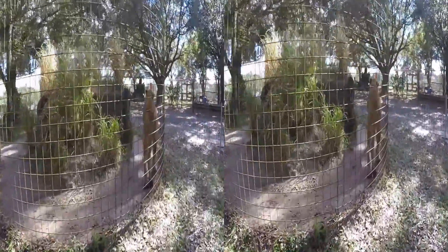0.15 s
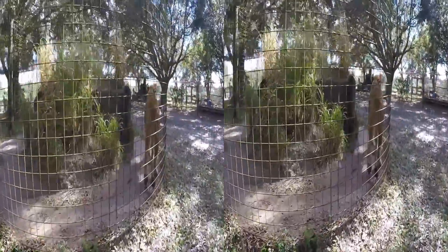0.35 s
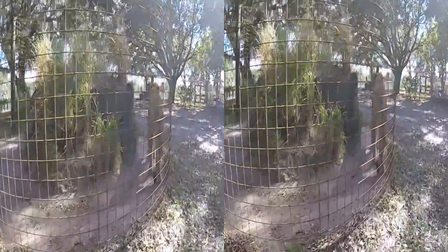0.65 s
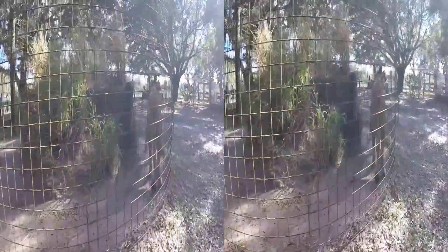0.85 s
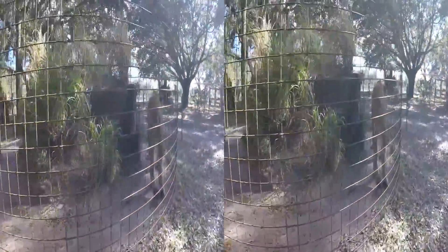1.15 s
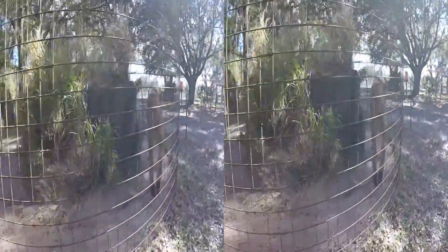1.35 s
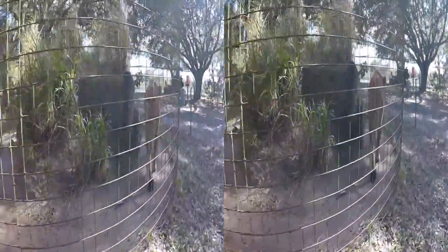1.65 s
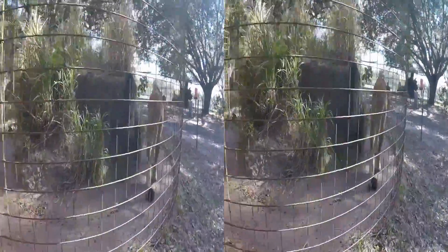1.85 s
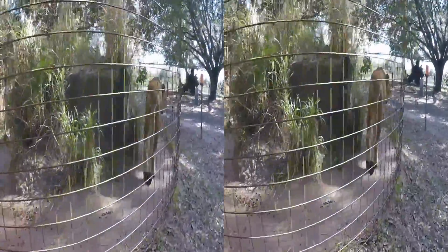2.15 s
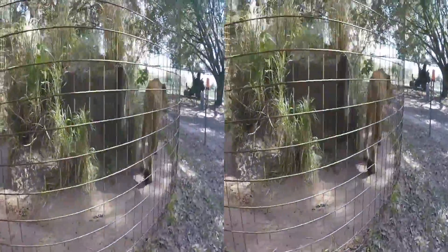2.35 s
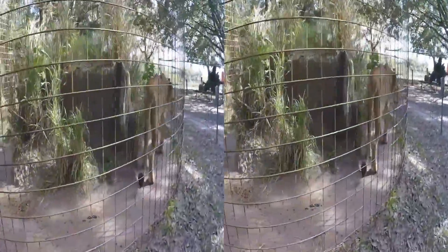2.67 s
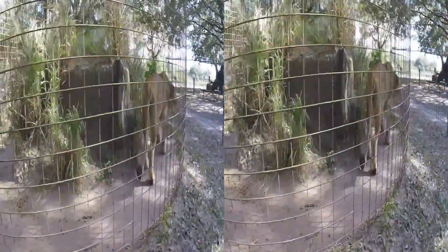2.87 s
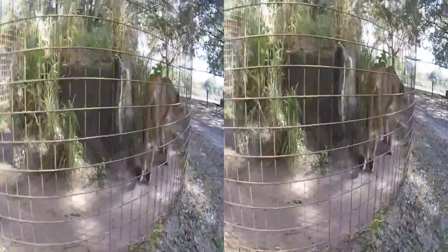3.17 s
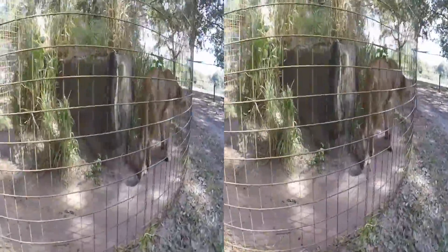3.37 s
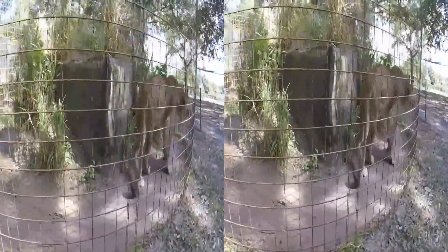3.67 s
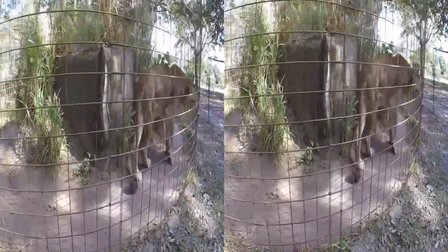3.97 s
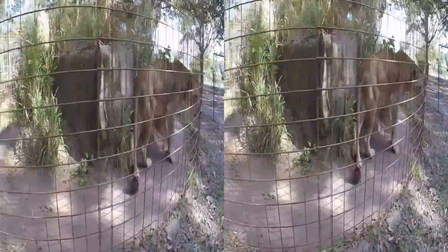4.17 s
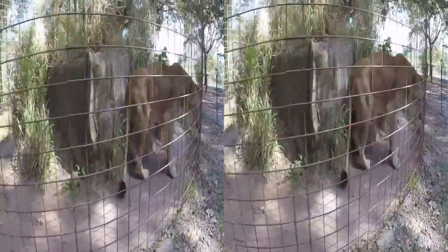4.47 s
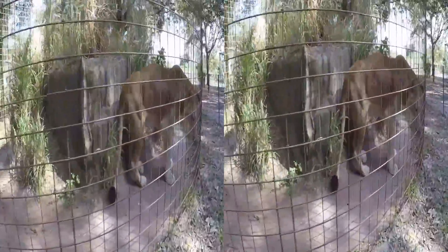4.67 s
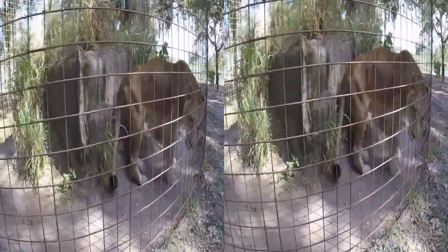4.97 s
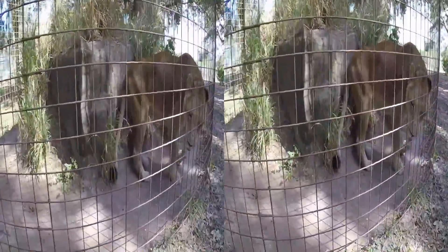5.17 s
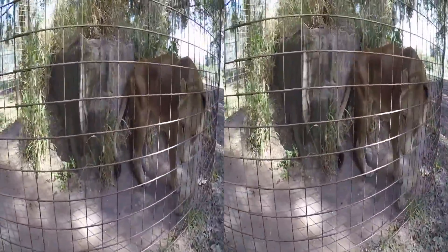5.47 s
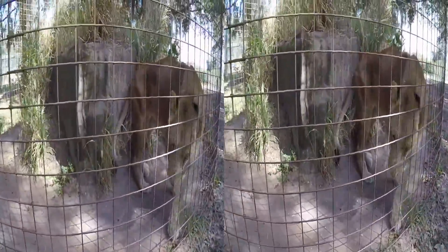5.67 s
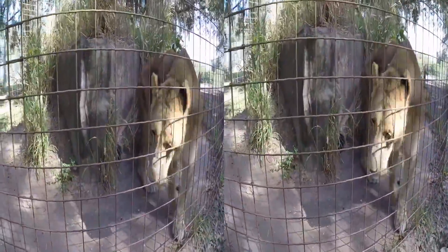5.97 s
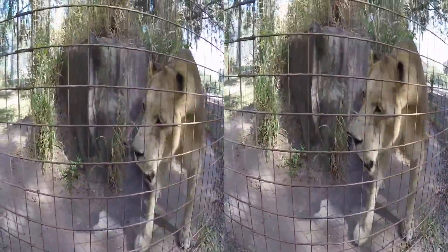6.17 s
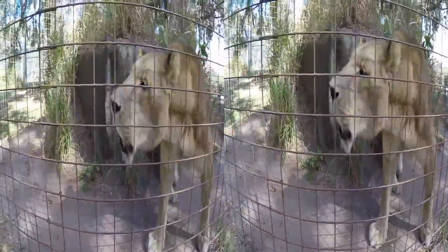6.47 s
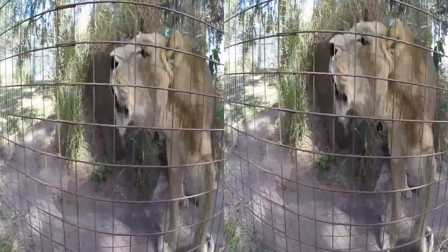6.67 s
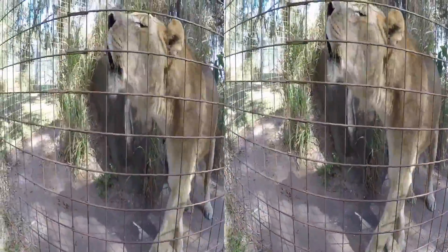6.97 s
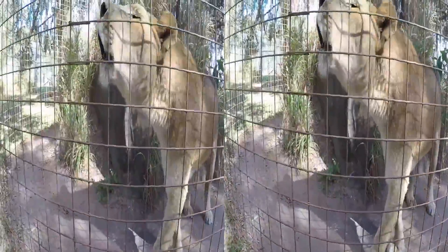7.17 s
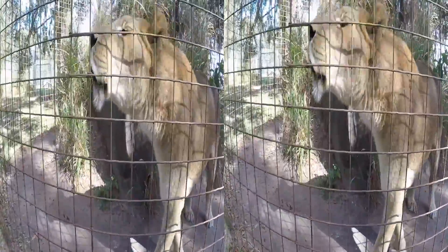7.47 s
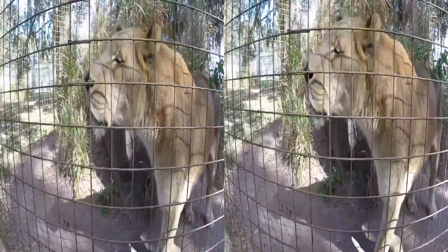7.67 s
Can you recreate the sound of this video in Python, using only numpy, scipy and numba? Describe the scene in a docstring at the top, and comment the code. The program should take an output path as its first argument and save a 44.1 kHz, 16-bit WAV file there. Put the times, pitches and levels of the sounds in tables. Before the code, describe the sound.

A lioness gives a short, low groan that ends in a rattle. Wind buffets the microphone in puffs while dry leaves rustle and twigs snap under her paws. She roars twice more as she approaches, each call moving from a moan through a thin whistle into a rough growl and rattle. The last is the loudest and closest. A bird chips faintly over distant air and traffic in a wooded outdoor place.

```python
"""A lioness groans while wind buffets the microphone. She roars three times as she walks closer among trees.
Her vocal folds beat through throat, palate, mouth and teeth over a pure chest tone; the later roars pass
from a moan through a thin whistle to a growl that skips every other beat, and each roar ends in a rattle.
Dry leaves rustle and twigs snap underfoot, and a far bird chips over a wash of distant air and traffic."""
import sys
import numpy as np
from scipy import signal
from scipy.fft import rfft, irfft, next_fast_len
from scipy.io import wavfile
from scipy.ndimage import uniform_filter1d, map_coordinates
from numba import njit

SR = 44100
rng = np.random.default_rng(int(sys.argv[2]) if len(sys.argv) > 2 else 0)


def wav_out(sig):
    """Save sig, one row per channel (or a flat mono array), as 16-bit PCM at SR to the path in sys.argv[1]."""
    wavfile.write(sys.argv[1], SR, np.round(np.clip(np.atleast_2d(sig).T, -1, 1) * 32767).astype(np.int16))


N = 345300
T = np.arange(N) / SR


def amp(db):
    return 10 ** (np.asarray(db) / 20)


def steady(x, seconds):
    """x levelled to rms 1 over a running window."""
    return x / np.sqrt(np.abs(uniform_filter1d(x ** 2, int(seconds * SR))) + 1e-12)


def curves(phrases):
    """A smooth automation lane for each column after time, then a gate that shuts between phrases."""
    times, *columns = np.transpose(np.concatenate(phrases))
    gate = sum((T >= rows[0][0]) & (T <= rows[-1][0]) for rows in phrases).clip(0, 1) * 1.0
    lanes = [uniform_filter1d(np.interp(T, times, column), 500) for column in columns]
    return lanes + [uniform_filter1d(gate, 600)]


def wobble(knots_per_s):
    """A smooth random modulator."""
    return map_coordinates(rng.standard_normal(int(N * knots_per_s / SR) + 4), [T * knots_per_s])


def eq(x, points):
    """x through an EQ curve of (freq_hz, gain_db) points on a log axis."""
    size = next_fast_len(N + 8192)
    hz, db = np.transpose(points)
    gain_db = np.interp(np.log(np.fft.rfftfreq(size, 1 / SR) + 1), np.log(hz + 1), db)
    return irfft(rfft(x, size) * amp(gain_db), size)[:N]


@njit
def resonate(x, hz, width_hz):
    """A two-pole resonance whose centre can move."""
    y = np.zeros(len(x))
    r = np.exp(-np.pi * width_hz / SR)
    for i in range(2, len(x)):
        feedback = 2 * r * np.cos(2 * np.pi * hz[i] / SR) * y[i - 1] - r * r * y[i - 2]
        y[i] = (1 - r) * (x[i] - x[i - 2]) + feedback
    return y


# Fold texture per stage: skip_share (weakening of every other beat), roughness_share
FOLD_TEXTURES = {"moan": (0, .04), "break": (.4, .5), "slide": (.7, .27), "growl": (.8, .21),
                 "groan": (.12, .16), "rattle": (.6, .78)}
# Tract colour per stage: formant_sink_share_per_s, low_resonance_db, rasp_over_mouth_db
TRACT_COLOURS = {"moan": (0.33, 0, -14.5), "break": (0.06, -6.5, -10.5), "slide": (0.19, -3.5, -12.5),
                 "growl": (.27, -2, -6), "groan": (0.06, -20.5, -8), "rattle": (0, 2, -3.5)}
# Cue list of the roars (a negative fall rises): start_s, stage, throat_hz, throat_fall_hz_per_s,
# palate_hz, palate_fall_hz_per_s, palate_over_mouth_db, formant_ratio
STAGE_CUES = [(0, "break", 464, -2.5, 758, 150, 8, 0.97), (.22, "groan", 534, 9, 803, 29, 0.5, .94),
              (.52, "rattle", 593, 299.5, 792, 22, 4.5, 1.13),
              (2.8, "moan", 339.3, -500, 628, -100, 9.5, 1.3), (3.04, "break", 476, 1.5, 723, 1, 5, 1.15),
              (3.16, "slide", 527.5, 701, 747, 102, -1.5, 1.175),
              (3.299, "growl", 421, 280, 904, 31, -8, 1.253),
              (3.759, "rattle", 407, -17, 700, 0, -10, 1.034), (5.9, "moan", 422.8, -200, 712, 1, 8, 1.28),
              (6.172, "break", 482, 0.5, 692, 0, 8, 1.16), (6.35, "slide", 488.4, 32, 693, 52, 5.5, 1.2),
              (6.51, "growl", 417.9, 47, 893, 281, -2.5, 1.24),
              (6.83, "growl", 345.3, 78, 756, 0.5, -0.5, 1.04), (7.04, "groan", 406, 97, 781, 0, 0, 1.01),
              (7.15, "rattle", 424, 99.5, 801, 2, -6.5, 0.97)]


def larynx(glide_s=.04, longest_sink_s=.6):
    """Each stage sets folds and tract; the resonances drift as the larynx moves, then glide to the next."""
    starts = np.array([row[0] for row in STAGE_CUES])
    now = np.searchsorted(starts, T, side="right") - 1
    rows = np.array([FOLD_TEXTURES[stage] + tuple(cue) + TRACT_COLOURS[stage]
                     for _, stage, *cue in STAGE_CUES])
    (skip, rough, throat_hz, throat_fall, palate_hz, palate_fall,
     palate_over_db, ratio, sink, low_db, rasp_over_db) = rows[now].T
    since = np.minimum(T - starts[now], longest_sink_s)
    sunk = throat_hz - throat_fall * since, palate_hz - palate_fall * since, ratio * (1 - sink * since)
    controls = [skip, rough, *sunk, low_db, palate_over_db, rasp_over_db]
    return uniform_filter1d(controls, int(glide_s * SR), axis=1)


def vocal_folds(pitch_hz, skip, rough):
    """The folds beat and let a puff of breath through each time; returns beats, breath, phase in cycles."""
    cycles = np.cumsum(pitch_hz * (1 + .006 * wobble(30))) / SR
    at = np.flatnonzero(np.diff(np.floor(cycles)))
    shimmer, jitter = rng.standard_normal((len(at), 2)).T
    strength = (1 - skip[at] * (np.arange(len(at)) % 2)) * amp((4 * rough[at] - .5) * shimmer)
    late = (.22 * rough[at] * jitter * SR / pitch_hz[at]).astype(int)
    beats = np.bincount(np.clip(at + late, 0, N - 1), strength, N)
    airflow = signal.fftconvolve(beats, np.exp(-T[:900] / .013))[:N] + .12  # a little air always leaks
    return steady(beats, .58), steady(airflow * rng.standard_normal(N), .15), cycles


def throat(source, hz, low_db, rough):
    """The body of the roar: a narrow moving resonance and a wide low one."""
    upper = resonate(source(.6 * rough), hz, 55.)
    upper = steady(resonate(upper, hz, 300.), .1)  # steeper flanks
    lower = steady(resonate(source(.5 * rough ** 2), np.full(N, 250.), 190.), .13)
    body = eq(upper - amp(low_db) * lower, [(110, -40), (185, 5), (640, -1), (1000, -30.5)])
    return steady(body, .13)


def palate(drive, hz):
    """One sharp resonance rings above the throat."""
    ring = resonate(drive, hz, 31.)
    return steady(eq(ring, [(400, -37), (620, 1.5), (950, .5), (1400, -26.5)]), .34)


def formants(drive, modes, ratio, waver_db):
    """Parallel resonances of alternating sign, shifted together, each swelling as the jaw moves."""
    return sum((-1) ** k * amp(db + waver_db * wobble(14)) * resonate(drive, hz * ratio, width_hz)
               for k, (hz, width_hz, db) in enumerate(modes))


# Mouth resonances: centre_hz, width_hz, level_db
MOUTH_FORMANTS = [(943, 54, 0), (1183, 64, 4.5), (1360, 30, 2.5), (1560, 150, -5)]


def mouth(drive, ratio):
    """The open mouth gives the roar its vowel."""
    vowel = formants(drive, MOUTH_FORMANTS, ratio, waver_db=2.5)
    return steady(eq(vowel, [(650, -20.5), (900, 8.5), (1900, -2.5), (2600, -21)]), .14)


# Resonances at the teeth: centre_hz, width_hz, level_db
TEETH_FORMANTS = [(1993, 98, 0), (2330, 200, 2.5), (2753, 180, 0), (3060, 150, 3), (3610, 200, -0.5),
                  (4075, 180, -3), (4740, 460, -8), (5500, 490, -10), (6440, 590, -17.5)]
# EQ of the breath hiss: freq_hz, gain_db
HISS_EQ = [(3240, -43.5), (5500, -15), (6250, -10), (8190, -3.5), (9500, -12.5), (11500, -16.5),
           (15100, -19.5)]


def teeth_rasp(breath, ratio, level_db):
    """Breath rasps past the teeth; the hiss on top gains as the rasp gets louder."""
    rasp = formants(breath, TEETH_FORMANTS, ratio ** .3, waver_db=3)
    rasp = steady(eq(rasp, [(1400, -30.5), (1900, -3.5), (6500, -4), (9000, -15)]), .08)
    hiss_db = -17.5 + .1 * (level_db + 42.5) + .83 * wobble(18)
    return amp(level_db) * (rasp + amp(hiss_db) * steady(eq(breath, HISS_EQ), .092))


# Hard closures of the folds: start_s, accent_db
FOLD_SLAPS = [(0.5202, 12.5), (0.563, 4), (3.8026, 2.5), (3.8425, 5), (3.8825, -5.5), (3.913, -4.5),
              (3.9856, -2.5), (4.0082, 3), (4.045, -8), (4.0918, 4.5), (6.569, 2), (6.74, 6.5),
              (6.7957, -2), (6.8435, 1), (6.8933, 6), (7.1973, 9.5), (7.217, 2), (7.2536, -2), (7.2894, 10),
              (7.3122, 10), (7.3946, 10)]


def fold_slaps(rough, small_per_s=22, small_db=1.5):
    """A gain accent at each hard closure, with small random ones that grow with roughness."""
    t = T[:1500]
    onset = 1 - np.exp(-t / .0015)  # soft tissue takes a moment
    hits = (rng.random(N) < small_per_s / SR) * rough * amp(small_db + 3.4 * wobble(60))
    for start_s, db in FOLD_SLAPS:
        hits[round(start_s * SR)] = amp(db)
    return signal.fftconvolve(hits, np.exp(-t / .0039) * onset)[:N]


# Beat of the folds, one phrase per roar: time_s, pitch_hz, chest_db
ROAR_PITCH = [
    [(0.0, 127, -13.5), (0.044, 139.3, -27.5), (0.156, 137.2, -13), (0.552, 125.9, -13.5),
     (0.63, 125.3, -24), (0.678, 100.6, -21), (0.74, 98.5, -50)],
    [(2.9, 151.2, -37), (3.03, 159.9, -54), (3.338, 139.1, -26), (3.558, 143.9, -12), (3.652, 134.5, -10),
     (3.808, 137.6, -12.5), (4.032, 128.8, -15), (4.2, 104.8, -43)],
    [(5.95, 135, -55), (6.03, 145.9, -36), (6.088, 171.7, -30), (6.202, 157.9, -66), (6.478, 154.4, -37.5),
     (6.554, 132.8, -20.5), (6.736, 134.9, -20), (6.874, 130.6, -18.5), (6.992, 134.9, -13.5),
     (7.052, 145.6, -8.5), (7.164, 142.5, -12.5), (7.21, 127.9, -15), (7.338, 116, -23), (7.46, 121.6, -67)],
]
# Faders of the tract, one phrase per roar: time_s, throat_db, mouth_db
ROAR_LEVELS = [
    [(0, -35.5, -47), (.2, -33, -43), (.3, -32, -42), (.54, -28, -42.5), (.678, -29, -45.5),
     (.716, -47, -66), (.74, -48, -61)],
    [(2.9, -38.5, -64), (3.146, -32, -41.5), (3.204, -26, -35), (3.3, -22.5, -38), (3.42, -23, -36),
     (3.58, -26.5, -33), (4.046, -25, -24), (4.134, -32, -37), (4.15, -45, -55), (4.2, -61, -43)],
    [(6.0, -69, -75), (6.05, -35.5, -54.5), (6.196, -11, -33), (6.252, -56, -52), (6.33, -63.5, -46.5),
     (6.38, -18, -30), (6.52, -10.5, -29.5), (6.81, -9.5, -26.5), (6.9, -11, -25), (7.1, -10.5, -20),
     (7.22, -15.5, -29), (7.33, -18.5, -28.5), (7.416, -37, -47), (7.46, -57, -83)],
]


def roar(nearing_db_per_s=1):
    """Beats and breath through throat, palate, mouth and teeth, over the pure tone of the chest."""
    pitch_hz, chest_db, gate = curves(ROAR_PITCH)
    throat_db, mouth_db, _ = curves(ROAR_LEVELS)
    skip, rough, throat_hz, palate_hz, ratio, low_db, palate_over_db, rasp_over_db = larynx()
    flap, flap_db, flapping = tissue_flap()
    beats, breath, cycles = vocal_folds(pitch_hz, skip, rough)

    def source(breath_share):
        """Equal-power crossfade from beats to breath."""
        share = np.clip(breath_share, 0, 1)
        return np.sqrt(1 - share) * beats + np.sqrt(share) * breath

    effort_db = .26 * (np.clip(throat_db, -32, 0) + 12)  # a louder throat rasps more
    distance_db = nearing_db_per_s * (T - T[-1])  # the rasp carries better as she comes close
    body = amp(throat_db) * throat(source, throat_hz, low_db, rough)
    bite = amp(mouth_db + palate_over_db) * palate(source(2.2 * rough), palate_hz)
    bite += amp(mouth_db) * mouth(source(.46 + rough), ratio)
    bite += teeth_rasp(breath, ratio, mouth_db + rasp_over_db + effort_db + distance_db)
    accent = fold_slaps(rough)
    sustain = .9 - .35 * flapping  # slack folds leave gaps between the closures
    voice = body * (sustain + 1.1 * rough * accent) + bite * (sustain + accent)
    chest = amp(chest_db + 4 * rough * wobble(40)) * np.sqrt(2) * np.sin(2 * np.pi * cycles)
    chest *= 1 + .5 * flapping * amp(flap_db - flap_db.max()) * flap  # the flap chops the tone
    return gate * (chest + voice) + flapping * amp(flap_db) * np.sqrt(2) * flap


# Fader of the steady buffeting: time_s, level_db
WIND_LEVELS = [(0, -16), (.2, -23), (.65, -18), (.9, -33), (1.25, -25.5), (1.6, -26), (1.72, -33),
               (3.3, -27), (4.3, -38), (7.1, -37.5), (7.5, -45), (7.83, -45)]
# Puffs on the microphone: start_s, length_s, rumble_db, edge_db
WIND_GUSTS = [(0.597, 0.1, -29, -29), (0.768, .1, -28, -43), (.94, 0.078, -18, -30), (1.08, .1, -50, -40),
              (1.293, 0.081, -31, -21.5), (1.39, 0.14, -25, -23.5), (1.556, 0.091, -20.5, -28.5),
              (1.912, 0.074, -21, -24.5), (2.026, 0.073, -33, -23.5), (2.131, 0.083, -31, -31.5),
              (2.312, 0.068, -20.5, -23), (2.392, .07, -20, -24.5), (2.494, 0.098, -14.5, -20),
              (2.612, .1, -23.5, -22.5), (2.82, 0.091, -21.5, -25), (2.964, .28, -28.5, -45),
              (3.403, 0.17, -19, -47)]
# EQ of the wind's rumble: freq_hz, gain_db
RUMBLE_EQ = [(7.1, -39.5), (12, -2), (43, 8), (110, 2.5), (140, -35), (240, -120)]
# EQ of its upper edge: freq_hz, gain_db
EDGE_EQ = [(56, -61), (95, -5.5), (150, -1), (226, -18), (303, -23.5), (417, -37), (800, -51),
           (1040, -63.5), (1760, -120)]


def wind(rise_s=.015, fall_s=.011):
    """Lumpy low pressure on the microphone; puffs start and stop quickly and reach higher."""
    def puff(start_s, length_s):
        ramps = np.minimum((T - start_s) / rise_s, (start_s + length_s - T) / fall_s)
        return np.clip(ramps + .5, 0, 1) ** 2

    _, flap_db, flapping = tissue_flap()
    rumble_gain = amp(curves([WIND_LEVELS])[0])
    rumble_gain += flapping * amp(flap_db - .5)  # low noise also comes with the flapping tissue
    rumble_gain += sum(amp(db) * puff(start, length) for start, length, db, _ in WIND_GUSTS)
    edge_gain = amp(-13.5) * rumble_gain
    edge_gain += sum(amp(db) * puff(start, length) for start, length, _, db in WIND_GUSTS)
    lumps = wobble(22)
    rumble = steady(eq(rng.standard_normal(N), RUMBLE_EQ) * amp(2.5 * lumps), .16)
    edge = steady(eq(rng.standard_normal(N), EDGE_EQ) * amp(6.5 * lumps + 6.9 * wobble(40)), .0356)
    return rumble_gain * rumble + edge_gain * edge


# EQ of far air and traffic: freq_hz, gain_db
AIR_EQ = [(56, -30.5), (95, -1), (136, -6), (312, -22.5), (615, -25), (1000, -27), (2150, -39), (2440, -38),
          (5240, -44), (13900, -53.5), (15100, -58)]
# Fader of that bed: time_s, level_db
AIR_LEVELS = [(0, -41.5), (6, -43), (7.3, -55.5), (7.83, -48.5)]


def far_air():
    """A dark bed of distant air and traffic, wavering a little."""
    bed = steady(eq(rng.standard_normal(N), AIR_EQ), .69)
    return bed * amp(curves([AIR_LEVELS])[0] + .57 * wobble(5.7))


# Paws in dry leaves: centre_s, level_db, spread_s
PAW_STEPS = [(0.501, -51.5, 0.074), (0.754, -51.5, 0.0044), (1.13, -58, 0.036), (1.32, -74, 0.035),
             (1.719, -52, 0.017), (1.95, -65, 0.21), (2.52, -56, 0.05), (4.22, -52, 0.05),
             (4.43, -60, 0.029), (4.65, -59, 0.026), (4.93, -55.5, 0.053), (5.52, -63, 0.033),
             (5.65, -62, 0.1), (5.87, -68.5, 0.041)]
# EQ of the leaves: freq_hz, gain_db
LEAF_EQ = [(470, -31), (800, -2), (1500, -1.5), (1890, -3.5), (2220, -5), (4700, -10.5), (6640, -16),
           (15100, -34)]


def dry_leaves():
    """A grainy rustle swells under each step; between steps the leaves never lie quite still."""
    steps = sum(amp(db) * np.exp(-.5 * ((T - centre) / spread) ** 2) for centre, db, spread in PAW_STEPS)
    stir = amp(curves([AIR_LEVELS])[0] - 23 + 6.2 * wobble(10))
    grains = rng.standard_normal(N) * amp(3.6 * wobble(230))
    return (steps + stir) * steady(eq(grains, LEAF_EQ), .039)


# Calls of a far bird: start_s, level_db, pitch_hz, t60_s
BIRD_CHIPS = [(0.8345, -61.5, 6699, 0.22), (5.8554, -51.5, 6670, 0.24), (7.651, -63, 6650, 0.28)]


def bird():
    """Each high chip trails off in echoes among the trunks: a narrow, dying band of noise."""
    out, t = np.zeros(N + SR), T[:SR // 4]
    for start_s, db, hz, t60_s in BIRD_CHIPS:
        ring = resonate(rng.standard_normal(len(t)), np.full(len(t), float(hz)), 250.)
        envelope = amp(db + 3 - 60 * t / t60_s) * (1 - np.exp(-t / .0021))
        out[round(start_s * SR):][:len(t)] += envelope * ring / np.std(ring)
    return out[:N]


# Twigs breaking underfoot: start_s, crack_db, crack_hz, knock_db
TWIG_SNAPS = [(1.3481, -54, 2080, -31), (1.7893, -36.5, 2030, -22), (1.9885, -31, 3660, -39),
              (2.0174, -23.5, 5500, -28), (2.0407, -32.5, 3970, -37), (2.142, -36, 2060, -41),
              (2.1881, -33, 3940, -43), (2.2138, -31, 3360, -33), (2.2685, -34, 2700, -40),
              (2.388, -36, 3120, -34), (2.4269, -45, 2540, -22.5), (2.494, -33.5, 2010, -40),
              (2.565, -31.5, 2350, -37), (4.1733, -36.5, 4730, -36), (4.431, -38, 1998, -34),
              (4.7774, -38.5, 1960, -27), (5.0651, -42.5, 2090, -34), (5.5415, -49, 2850, -14.5),
              (5.6461, -46, 3300, -39), (5.695, -50.5, 2130, -36)]


def twigs():
    """A snapping twig gives a short bright crack, a dull knock and a faint tick of treble."""
    out, t = np.zeros(N + SR), T[:SR // 4]
    for start_s, db, hz, knock_db in TWIG_SNAPS:
        crack = rng.standard_normal(len(t))
        for _ in range(2):  # steep flanks
            crack = resonate(crack, np.full(len(t), float(hz)), .53 * hz)
        crack *= amp(db - 6.5 - 60 * t / .013) / np.std(crack)
        knock = amp(knock_db - 60 * t / .0033) * np.sin(2 * np.pi * 800 * t)
        tick = amp(db - 26.5 - 60 * t / .006) * np.diff(rng.standard_normal(len(t) + 1))
        out[round(start_s * SR):][:len(t)] += crack + knock + tick
    return out[:N]


# Thin high register of the second and third roars: time_s, pitch_hz, level_db
WHISTLE_PHRASES = [
    [(3.04, 691, -39.5), (3.096, 701, -24.5), (3.185, 683, -27)],
    [(6.16, 880, -46.5), (6.21, 822, -38.5), (6.29, 750, -30), (6.332, 689.6, -10), (6.4, 679.4, -20.5),
     (6.456, 638, -21), (6.55, 605.3, -29.5)],
]
# Its overtones at full voice: harmonic_number, relative_db
WHISTLE_OVERTONES = [(2, -27.5), (3, -38), (4, -43.5), (5, -43.5), (6, -48), (7, -55), (10, -54)]


def whistle(full_voice_db=-15):
    """A nearly pure tone from the edges of the folds, with weak flickering overtones."""
    hz, db, gate = curves(WHISTLE_PHRASES)
    phase = 2 * np.pi * np.cumsum(hz * (1 + .00358 * wobble(50))) / SR
    lift_db = .29 * (full_voice_db - db)  # overtones fade less than the tone
    overtones = sum(amp(relative_db + lift_db + 8.2 * wobble(25)) * np.sin(k * phase)
                    for k, relative_db in WHISTLE_OVERTONES)
    return gate * amp(db) * np.sqrt(2) * (np.sin(phase) + overtones)


# Low flutter ending the second and third roars: time_s, pitch_hz, level_db
FLAP_PHRASES = [
    [(3.75, 55.23, -40), (3.992, 51.1, -20.5), (4.2, 55.48, -38)],
    [(7.03, 58.9, -56), (7.204, 59.4, -28), (7.44, 40.26, -34)],
]


def tissue_flap():
    """Loose tissue flaps as a roar runs out; returns its tone, level and gate."""
    hz, db, gate = curves(FLAP_PHRASES)
    return np.sin(2 * np.pi * np.cumsum(hz) / SR), db, gate


def tree_echo(voice, t60_s=.3):
    """The trunks scatter the voice into a short, slightly delayed tail."""
    tail = rng.standard_normal(SR // 2) * amp(-60 * T[:SR // 2] / t60_s)
    return signal.fftconvolve(np.pad(voice, (700, 0)), tail / np.linalg.norm(tail))[:N]


def scene():
    """The lioness and her echo up front, wind and woodland around her, in mono."""
    lioness = roar() + whistle()
    echo = amp(-20) * tree_echo(lioness)
    return (lioness + echo + wind() + far_air() + dry_leaves() + twigs() + bird())[None]


def record(dry):
    """The camera's input rounds off the highest peaks and keeps nothing above its band limit."""
    ceiling, top_hz = .92, 15290
    soft = dry / (1 + np.abs(dry / ceiling) ** 4) ** (1 / 4)
    size = next_fast_len(N + 8192)
    passband = np.fft.rfftfreq(size, 1 / SR) < top_hz
    return irfft(rfft(soft, size) * passband, size)[:, :N]


dry = scene()
out = record(dry)
wav_out(out)
```